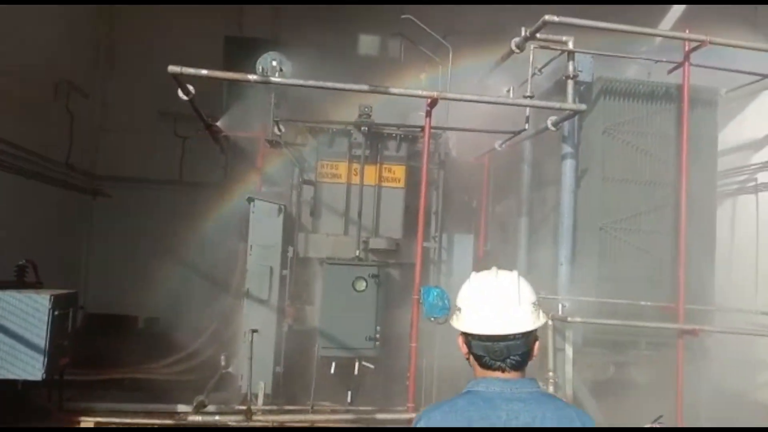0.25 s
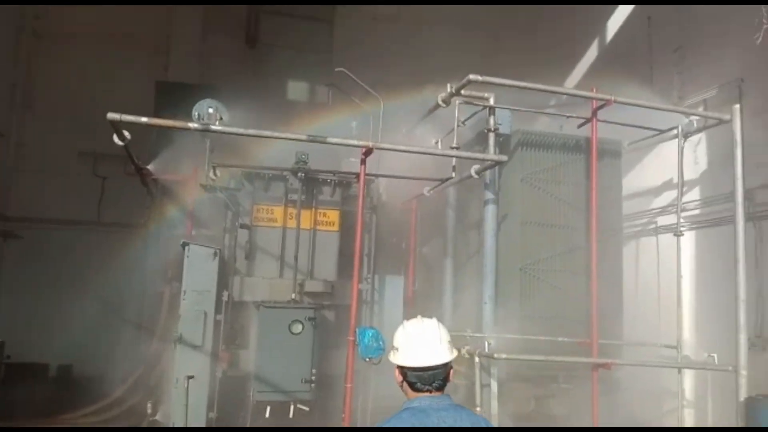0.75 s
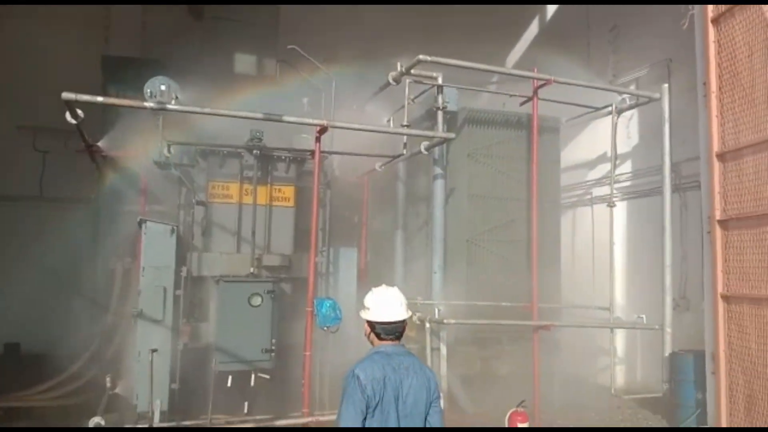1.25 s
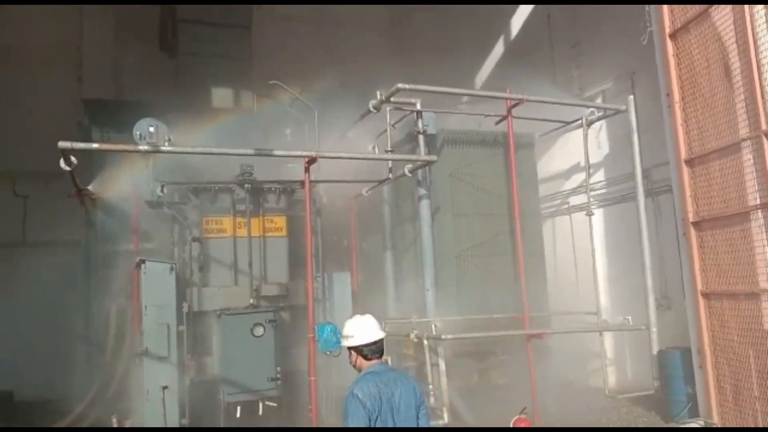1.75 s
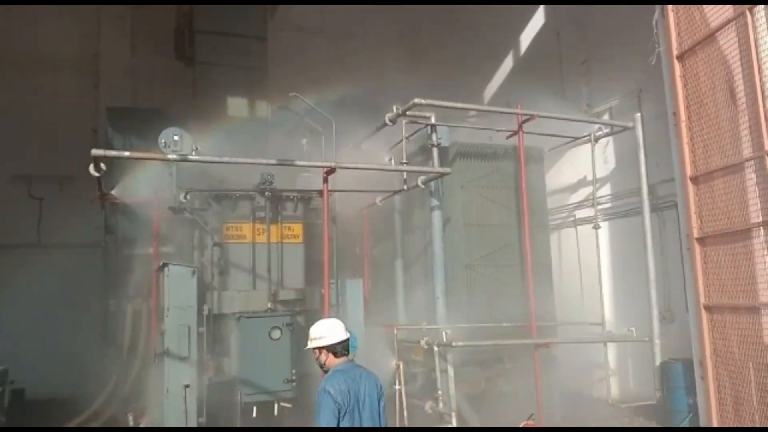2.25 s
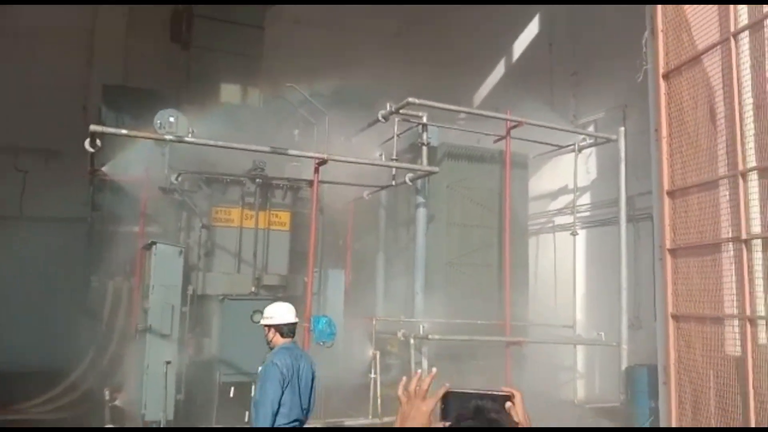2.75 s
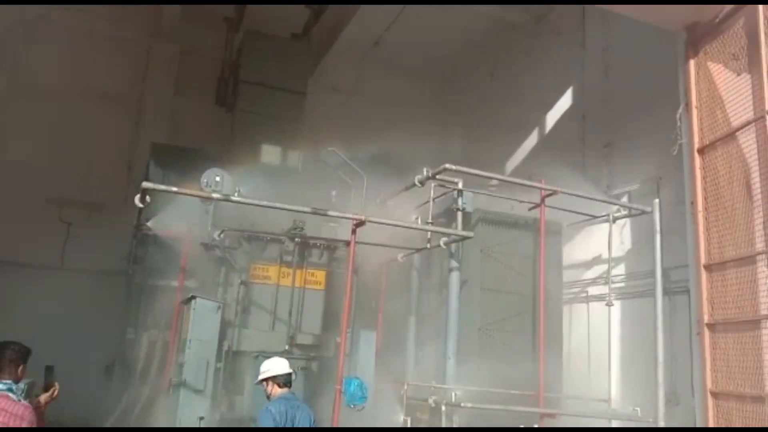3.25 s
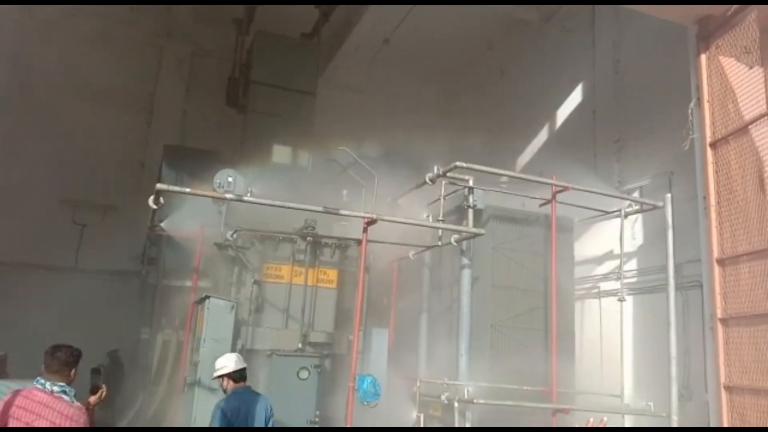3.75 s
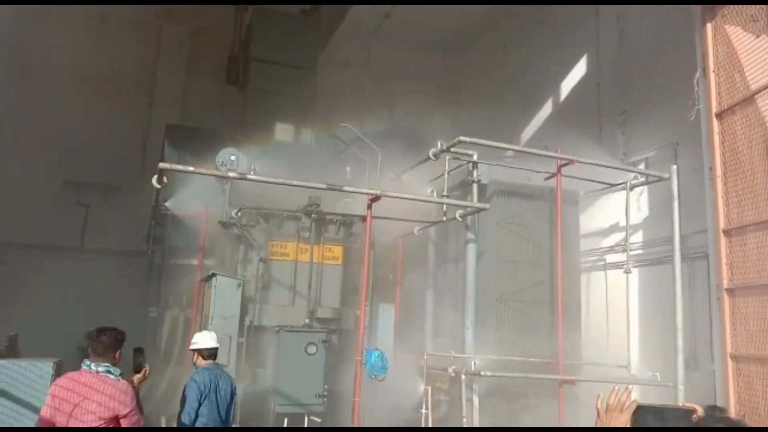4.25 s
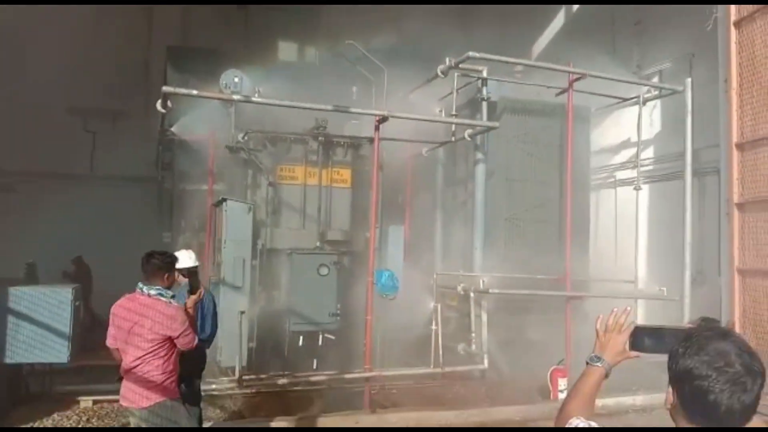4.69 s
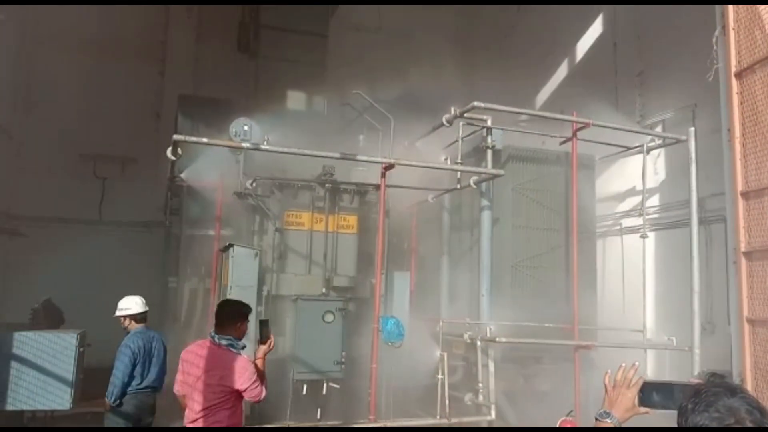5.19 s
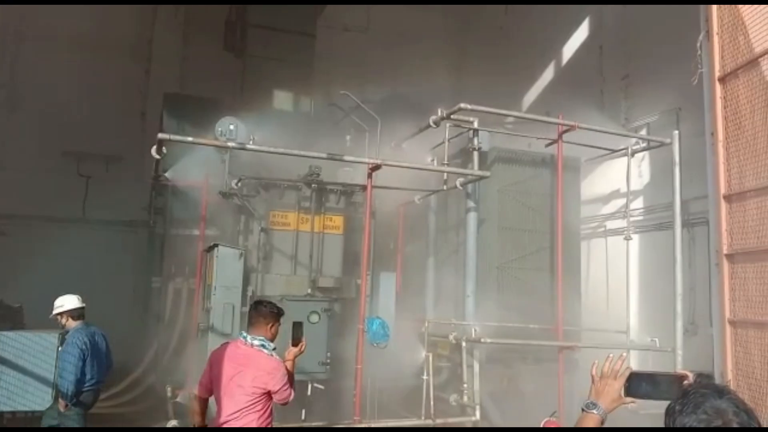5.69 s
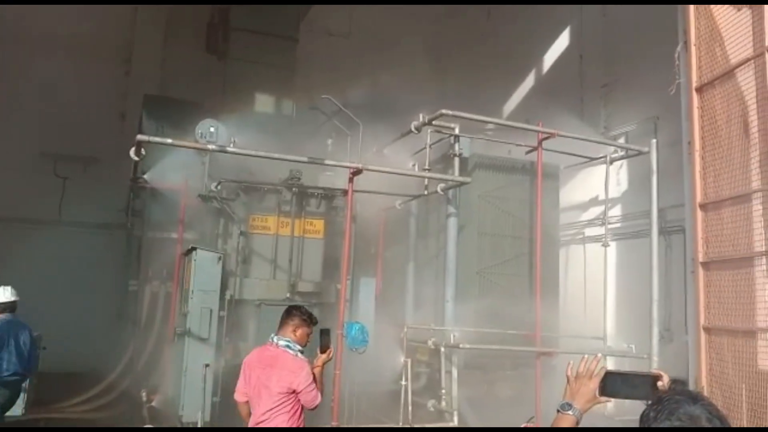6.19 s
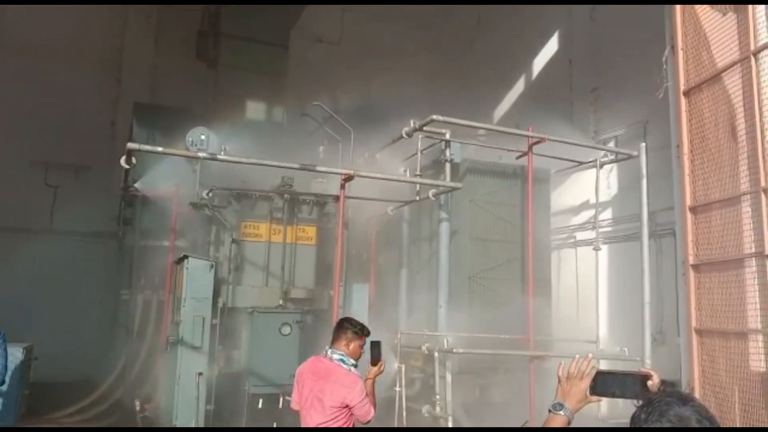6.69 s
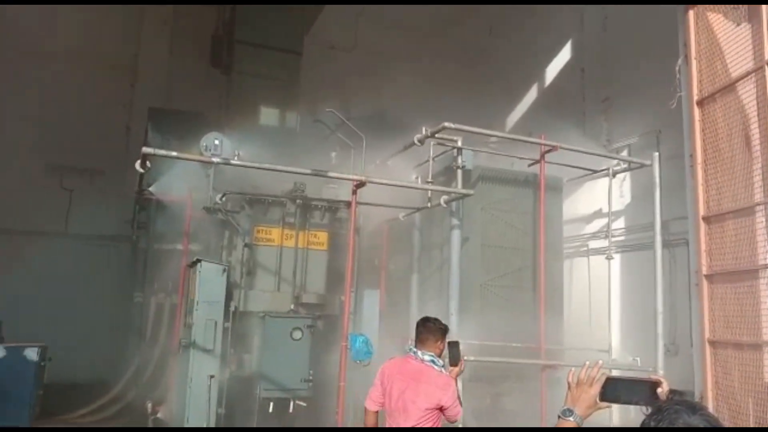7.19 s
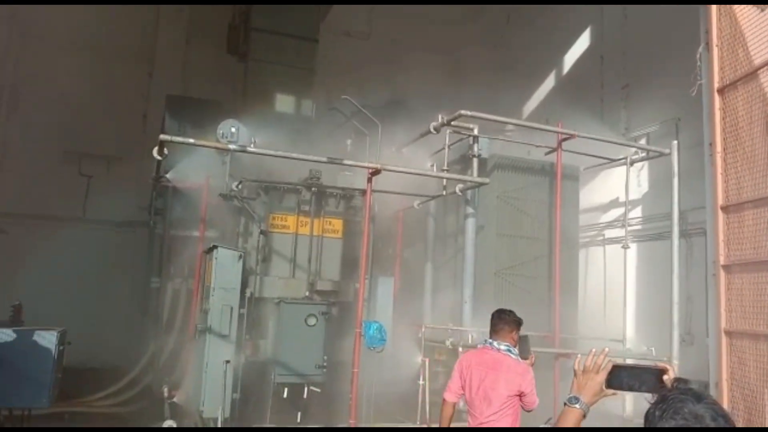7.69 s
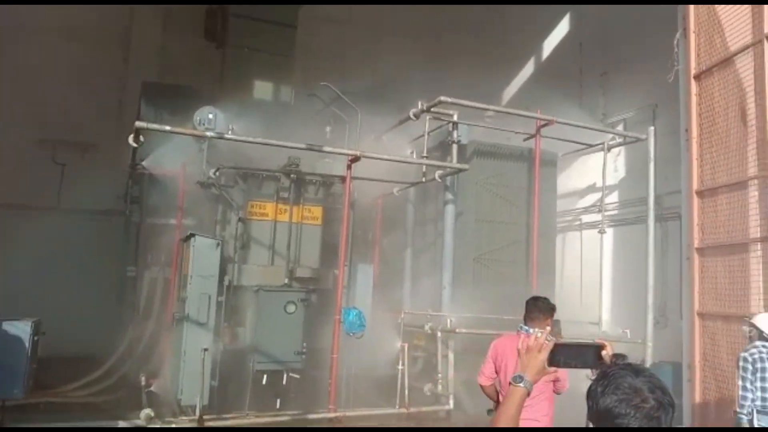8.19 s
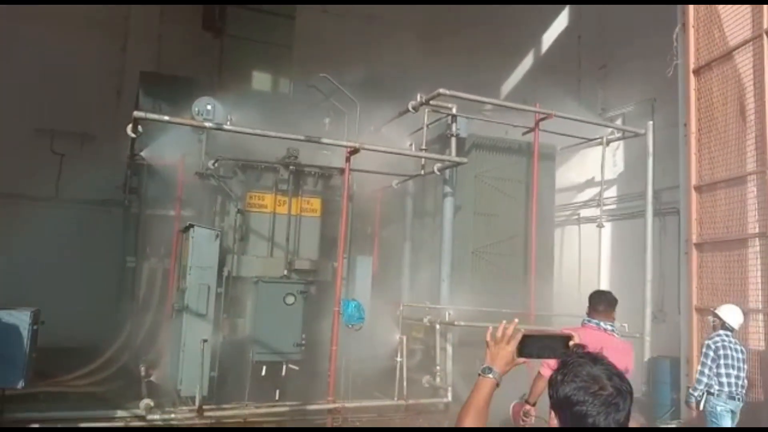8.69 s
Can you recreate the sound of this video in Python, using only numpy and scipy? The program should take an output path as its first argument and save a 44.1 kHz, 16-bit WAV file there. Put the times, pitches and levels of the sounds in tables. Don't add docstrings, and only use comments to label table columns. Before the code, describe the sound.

Dozens of water mist nozzles hiss loudly and steadily over a transformer in a large concrete bay, then cut abruptly to silence.

```python
import sys
import numpy as np
from scipy import signal
from scipy.fft import rfft, irfft, next_fast_len
from scipy.io import wavfile
from scipy.ndimage import uniform_filter1d, map_coordinates

SR = 44100
rng = np.random.default_rng(int(sys.argv[2]) if len(sys.argv) > 2 else 0)


def field_ratio(decibels):
    return 10 ** (np.asarray(decibels, dtype=float) / 20)


def dump(signal):
    limited = np.clip(np.atleast_2d(signal).T, -1, 1)
    pcm = np.round(limited * 32767).astype(np.int16)
    wavfile.write(sys.argv[1], SR, pcm)


N = 394254

# (frequency [Hz], level [dB])
HUM_PARTIALS = [(100, -71), (200, -61.5), (300, -56), (600, -52), (700, -48)]
# (time [s], frequency [Hz], level [dB])
ENGINE_SWELL = [
    (1.85, 65, -75),
    (2.0, 65, -61.5),
    (2.2, 65, -55),
    (2.55, 66, -60),
    (2.75, 66, -82),
]

# (frequency [Hz], level [dB])
THUMP_SPECTRUM = [(20, -20.5), (45, -14), (64, -4), (80, -0.5), (105, 2.5), (140, -28), (250, -81)]
BOOM_SPECTRUM = [(60, -52.5), (105, -8.5), (150, -3.5), (250, -0.5), (330, -7.5), (500, -83)]
RUMBLE_SPECTRUM = [(200, -34), (290, -3.5), (370, -1.5), (500, 0), (580, -13), (900, -79)]
BODY_SPECTRUM = [(350, -71), (520, -7.5), (690, -3), (870, -2.5), (1020, -2.5), (1150, -10.5),
                 (1500, -69.5)]
# (centre [Hz], level [dB], patchiness [dB], flutter [dB], share of the draught [ratio])
AIR_LAYERS = [
    (85, -61.5, 3.5, 1.5, 1),
    (190, -46.5, 5, 1.5, 1),
    (400, -44, 4, 1.5, 0.81),
    (800, -33.5, 2.1, 1.5, 0.33),
]
# (time [s], level [dB])
DRAUGHT = [(0, 0.5), (.7, -0.5), (1.1, 0.5), (1.5, 0.5), (2.2, -1), (3.1, 0), (3.8, -1.5), (4.4, -1.5),
           (5.2, -2.5), (5.7, 1), (6.2, -1), (6.5, -0.5), (7, 0), (7.4, 0.5), (7.8, -1), (8.75, 2.5)]
# (time [s], centre [Hz], level [dB])
PUFFS = [(.14, 250, 5), (.36, 420, 6.5), (.53, 400, 8), (.9, 250, 6), (1.19, 201, -12), (1.27, 280, 8),
         (3.03, 160, 5), (3.45, 262, 5.5), (3.6, 130, -3.5), (3.94, 169, 7), (4.09, 190, 2),
         (4.16, 250, -3), (4.38, 190, -7), (4.82, 80, -10), (4.99, 303, -7), (5.33, 420, -6),
         (5.43, 490, -8.5), (5.6, 300, 6), (5.92, 300, 7), (6.01, 120, -3), (6.35, 230, -3),
         (6.74, 420, -11.5), (6.81, 320, 8), (7.15, 320, -3), (7.28, 480, -10), (7.42, 500, -7),
         (7.67, 420, 3), (8.18, 100, 8), (8.32, 420, -7.5), (8.54, 240, 6.5)]
PUFF_HALF_S, PUFF_HALF_OCTAVES = .04, 0.83

# (centre [Hz], width [Hz])
PIPE_RESONANCE = (1260, 89)
# (time [s], level [dB])
PIPE_FLOW = [(0, -35), (.5, -32), (1.5, -34), (2.6, -33.5), (3.2, -33), (4.2, -31.5), (4.9, -31.5),
             (5.2, -34.5), (5.55, -31), (6.5, -32.5), (7.2, -31.5), (7.7, -33.5), (8.1, -32), (8.75, -31.5)]
# (time [s], level [dB])
PIPE_SURGES = [(.24, 3), (.78, 2), (.87, 5), (.92, -10), (1.09, 0.5), (1.19, 5), (1.31, 2), (1.46, 7.5),
               (1.66, -7), (1.85, 8), (2.38, 2.5), (2.48, -22), (3.07, 2), (3.43, -2), (3.63, 6), (4.14, 5),
               (4.82, 4.5), (4.92, 3), (5.06, -11), (5.26, -9), (5.47, 5.5), (5.87, 5), (6.62, 2),
               (7.23, 4), (7.35, 5), (7.5, 8.5), (8.1, 7.5), (8.18, -10), (8.35, 3), (8.63, 10)]
WHISTLE_FLUTTER_DB, SURGE_HALF_S = 1.14, 0.022

# (time [s], level [dB])
JET_LEVEL = [
    (0, -19.5),
    (.4, -19.5),
    (1.2, -20),
    (1.8, -21),
    (3.5, -21),
    (5, -21),
    (6.7, -21),
    (7.9, -20.5),
    (8.4, -21),
    (8.75, -20),
]
# (time [s], level [dB])
CLOUD_NEARNESS = [
    (0, -1),
    (.5, -0.5),
    (1.7, .5),
    (4, 0),
    (6, 1),
    (7.2, 0),
    (8.15, -1.5),
    (8.3, 1.5),
    (8.75, 3),
]
# (frequency [Hz], level [dB])
JET_SPECTRUM = [(700, -65), (1000, -11), (1150, -7), (1550, -7.5), (1950, -6), (2300, -2.5), (2800, -2.5),
                (3300, -5), (3950, -4), (4150, -5.5), (4450, -11), (5000, -16.5), (6000, -76.5)]
FIZZ_SPECTRUM = [(3800, -66.5), (4500, -8), (5050, -1), (5750, 0.5), (6280, -4), (6680, -0.5), (7300, -1),
                 (8150, -11), (9450, -6), (11000, -12.5), (13900, -17.5), (14650, -6.5), (15450, -10.5)]
# (centre [Hz], width [Hz])
MIST_BAND = (10700, 2300)
FIZZ_DB, FIZZ_FOLLOWS = -6.5, -.25

# (time [s], centre [Hz])
SPLIT_BANDS = [(.328, 5000), (.444, 7600), (.584, 5700), (.955, 9000), (1.303, 5750), (2.046, 6300),
               (2.58, 9600), (2.697, 7600), (2.859, 6300), (2.998, 8600), (3.277, 9650), (3.347, 6300),
               (3.579, 4700), (4.113, 8300), (4.392, 6000), (5.019, 7600), (5.042, 4700), (5.39, 6650),
               (5.669, 8300), (6.017, 7800), (6.063, 4950), (6.203, 6950), (6.598, 6950), (6.737, 7250),
               (6.876, 10400), (7.317, 8300), (7.689, 4700), (7.898, 7900), (8.13, 6900), (8.153, 4950)]
SPLIT_BLOCK = 2048
SPLIT_WIDTH_HZ, SPLIT_LOWEST_HZ = 1700, 4200
UPPER_FROM_HZ, UPPER_TO_HZ, UPPER_CHANCE = 10500, 14400, .95

TOP_HZ = 15510
CUT_S = 8.7563
SMEAR_DB, SMEAR_RISE_S, SMEAR_DB_PER_S, SMEAR_END_S = -28.5, .005, 5500, .02


def unit(x):
    return x / np.sqrt(np.mean(x ** 2) + 1e-20)


def curves(rows):
    s, *cols = np.transpose(rows)
    t = np.arange(N) / SR
    return [np.interp(t, s, c) for c in cols]


def wobble(rate):
    knots = rng.standard_normal(int(N * rate / SR) + 4)
    return map_coordinates(knots, [np.arange(N) * rate / SR])


def bumps(times, heights, half_s):
    slow = np.arange(0, N + 64, 64) / SR
    bells = np.exp(-((slow - np.c_[times]) / half_s) ** 2)
    return np.interp(np.arange(N) / SR, slow, heights @ bells)


def filtered(x, response):
    m = next_fast_len(N + 8192)
    hz = np.fft.rfftfreq(m, 1 / SR)
    return irfft(rfft(x, m) * response(hz), m)[:N]


def colour(points):
    f, db = np.transpose(points)
    return lambda hz: field_ratio(np.interp(np.log(hz + 1), np.log(f + 1), db))


def resonance(centre_hz, width_hz):
    return lambda f: 1j * f * width_hz / (centre_hz ** 2 - f * f + 1j * f * width_hz)


def turbulence(patchy_db, size=512):
    z = signal.stft(rng.standard_normal(N), nperseg=size)[2]
    field = uniform_filter1d(rng.standard_normal(z.shape), size=5, axis=0)
    field = uniform_filter1d(field, size=5120 // size, axis=1)
    return unit(signal.istft(z * field_ratio(patchy_db * unit(field)), nperseg=size)[1][:N])


def steadied(x, share):
    power = np.abs(uniform_filter1d(x ** 2, size=SR // 25)) + 1e-6
    return unit(x / power ** (np.clip(share, 0, 1) / 2))


def drops(count, spread_db):
    when, side, chance = rng.random((count, 3)).T
    size = np.sign(side - .5) * field_ratio(-spread_db * np.log(1 - .998 * chance))
    return unit(np.bincount((when * N).astype(int), size, N))


def transformer():
    t = np.arange(N) / SR
    hum = 0
    for hz, db in HUM_PARTIALS:
        level = field_ratio(db - 5.0 + 3.4 * wobble(3.9))
        hum = hum + np.sqrt(2) * level * np.sin(2 * np.pi * hz * t + .6 * wobble(4))
    return hum


def far_engine():
    hz, db = curves(ENGINE_SWELL)
    phase = 2 * np.pi * np.cumsum(hz) / SR
    return np.sqrt(2) * field_ratio(db + 1.5 * wobble(12)) * np.sin(phase)


def bay_air():
    s, puff_hz, puff_db = np.transpose(PUFFS)
    (draught_db,) = curves(DRAUGHT)
    spectra = (THUMP_SPECTRUM, BOOM_SPECTRUM, RUMBLE_SPECTRUM, BODY_SPECTRUM)
    air = 0
    for spectrum, (hz, db, patchy_db, flutter_db, share) in zip(spectra, AIR_LAYERS):
        reach = np.exp(-(np.log2(puff_hz / hz) / PUFF_HALF_OCTAVES) ** 2)
        level_db = db + share * draught_db + flutter_db * wobble(12)
        level_db = level_db + bumps(s, reach * puff_db, PUFF_HALF_S)
        noise = unit(filtered(turbulence(patchy_db, size=2048), colour(spectrum)))
        air = air + field_ratio(level_db) * steadied(noise, share=0.35)
    return air


def supply_pipe():
    s, db = np.transpose(PIPE_SURGES)
    (flow_db,) = curves(PIPE_FLOW)
    level_db = flow_db + WHISTLE_FLUTTER_DB * wobble(24) + bumps(s, db, SURGE_HALF_S)
    mode = resonance(*PIPE_RESONANCE)
    ring = unit(filtered(turbulence(patchy_db=0.7), lambda f: mode(f) ** 2))
    return field_ratio(level_db) * steadied(ring, share=0.47)


def nozzles():
    (jet_db,), (cloud_db,) = curves(JET_LEVEL), curves(CLOUD_NEARNESS)
    flutter_db = 0.21 * wobble(8.2) + 0.095 * wobble(22)
    jet = turbulence(patchy_db=0.27) + 0.4 * drops(count=30000, spread_db=2.5)
    jet = unit(filtered(jet, colour(JET_SPECTRUM)))
    fizz = turbulence(patchy_db=0.4) + 0.42 * drops(count=40000, spread_db=2.5)
    fizz = unit(filtered(fizz, colour(FIZZ_SPECTRUM)))
    mode = resonance(*MIST_BAND)
    mist = unit(filtered(turbulence(patchy_db=4.0), lambda f: mode(f) ** 2))
    near = np.sqrt(np.maximum(field_ratio(2 * cloud_db) - 1, 0))
    treble = field_ratio(1.67 + FIZZ_FOLLOWS * cloud_db) * fizz + field_ratio(-9.0) * near * mist
    return field_ratio(jet_db + flutter_db) * (field_ratio(0.14) * jet + field_ratio(FIZZ_DB) * treble)


def scene():
    mono = transformer() + far_engine() + bay_air() + supply_pipe() + nozzles()
    return np.array([mono, mono])


def split_bands(x):
    out, hz = x.copy(), np.fft.rfftfreq(SPLIT_BLOCK, 1 / SR)
    window = np.sin(np.pi * (np.arange(SPLIT_BLOCK) + .5) / SPLIT_BLOCK)
    for s, centre_hz in SPLIT_BANDS:
        upper_hz = centre_hz
        if rng.random() < UPPER_CHANCE:
            upper_hz = rng.uniform(UPPER_FROM_HZ, UPPER_TO_HZ)
        distance_hz = np.minimum(abs(hz - centre_hz), abs(hz - upper_hz))
        inside = (distance_hz < SPLIT_WIDTH_HZ / 2) & (hz > SPLIT_LOWEST_HZ)
        middle = round(s * SR)
        span = slice(middle - SPLIT_BLOCK // 2, middle + SPLIT_BLOCK // 2)
        band = rfft(x[:, span]) * inside
        level = np.sqrt(uniform_filter1d(abs(band) ** 2, size=24, axis=1).clip(0))
        fresh = level * np.exp(2j * np.pi * rng.random(band.shape)) * inside
        out[:, span] += window * irfft(fresh) - (1 - np.sqrt(1 - window ** 2)) * irfft(band)
    return out


def low_pass(x):
    return signal.sosfilt(signal.butter(12, 15950, fs=SR, output="sos"), x)


def record(dry):
    after = np.arange(N) / SR - CUT_S
    smear_db = SMEAR_DB - SMEAR_DB_PER_S * np.abs(after - SMEAR_RISE_S)
    gate = np.where(after < 0, 1, field_ratio(smear_db) * (after < SMEAR_END_S))
    limited = np.array([filtered(ear, lambda hz: hz < TOP_HZ) for ear in split_bands(dry)])
    return low_pass(limited * gate)


dry = scene()
out = record(dry)
dump(out)
```